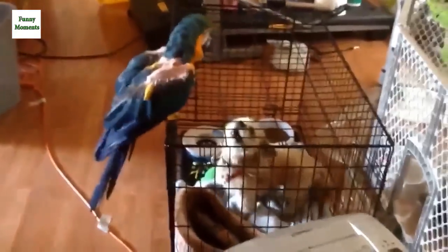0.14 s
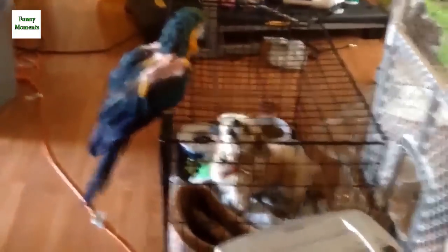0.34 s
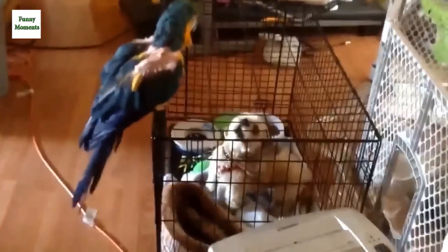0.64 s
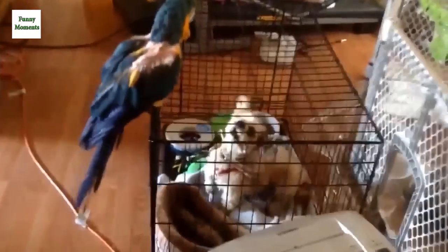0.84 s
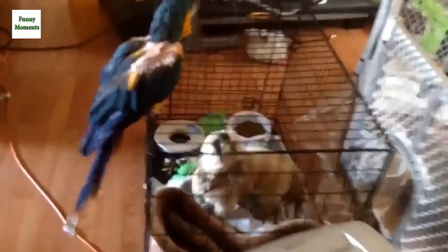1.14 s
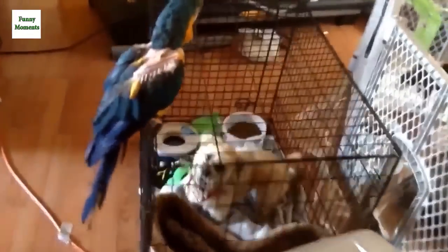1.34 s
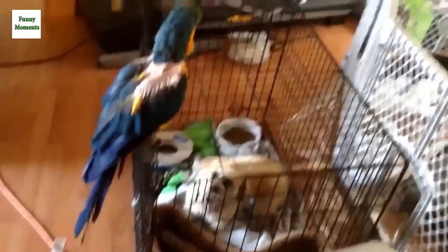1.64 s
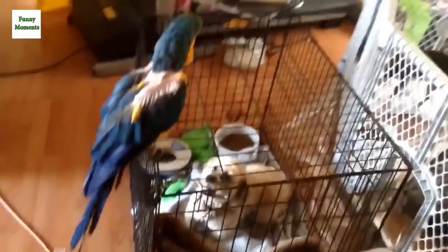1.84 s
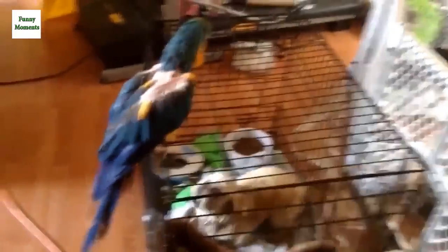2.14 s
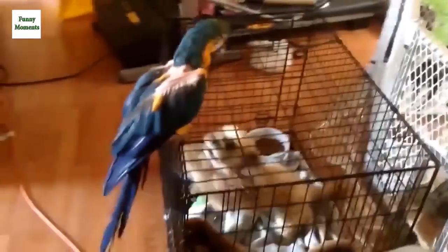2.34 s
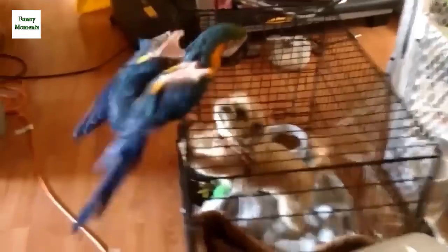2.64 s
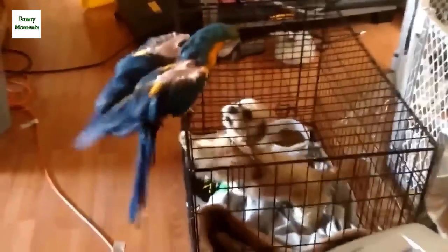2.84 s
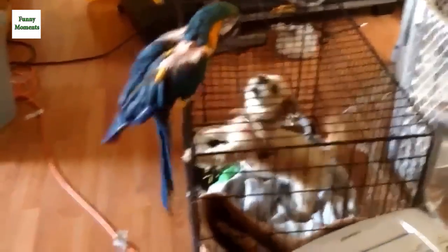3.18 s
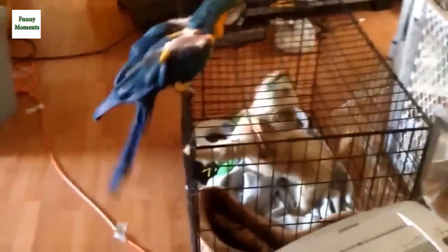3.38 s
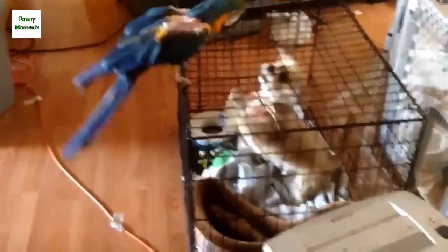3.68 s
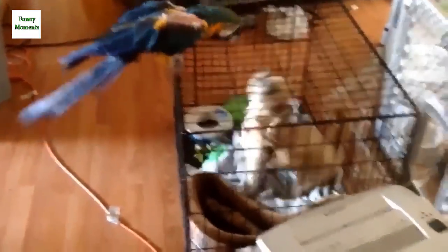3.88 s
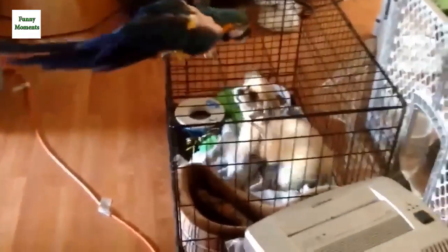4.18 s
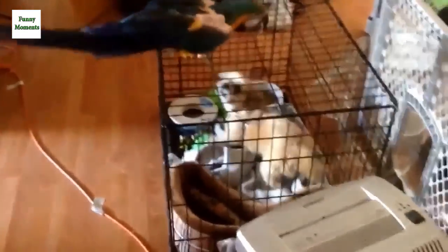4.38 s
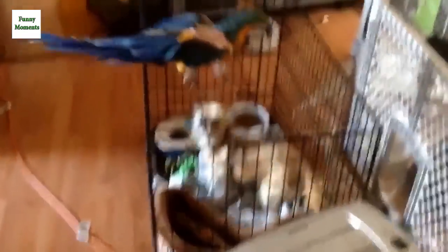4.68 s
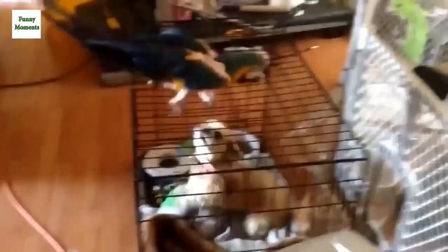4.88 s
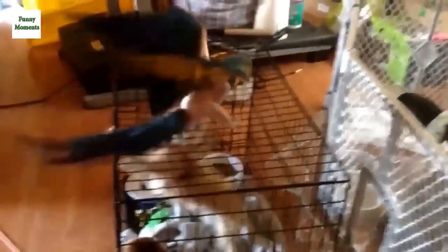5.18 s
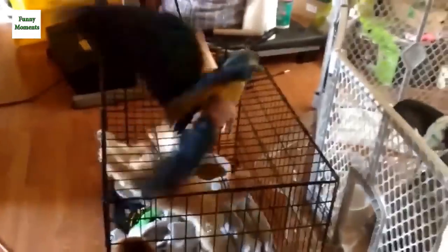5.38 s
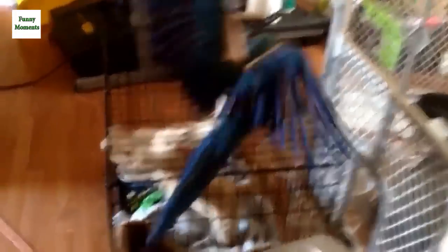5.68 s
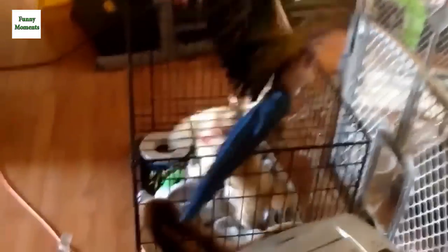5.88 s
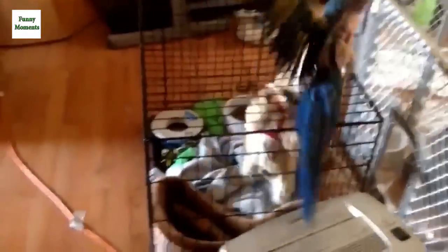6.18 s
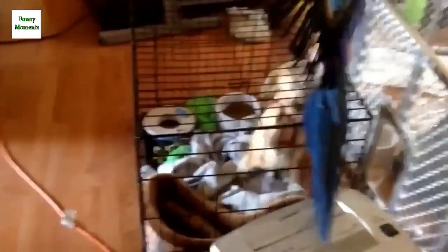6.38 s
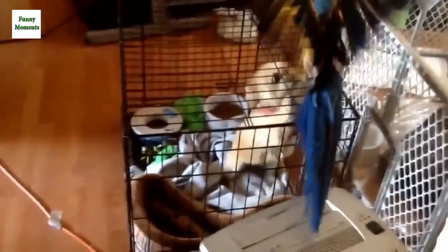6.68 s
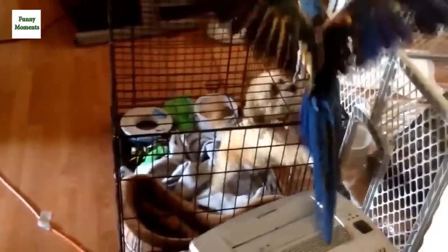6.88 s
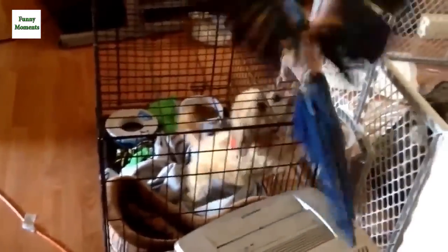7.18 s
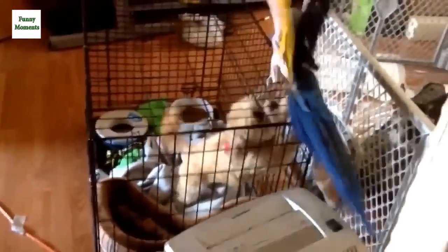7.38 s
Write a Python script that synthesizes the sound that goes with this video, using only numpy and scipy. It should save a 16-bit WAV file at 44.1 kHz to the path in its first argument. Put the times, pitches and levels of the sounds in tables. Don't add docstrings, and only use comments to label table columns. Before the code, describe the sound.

Breathy, pitch-breaking yaps from a small caged dog come first, irregularly spaced, with a soft whine after the third. The barking stops at about four seconds and gives way to scrambling paws, hard knocks, jingling wire and bursts of feathery flapping. A brief muffled growl sits under the late commotion. Indoors, lively hard-room reflections, quiet air, modest microphone with little bass.

```python
import sys
import numpy as np
from scipy import signal
from scipy.fft import rfft, irfft
from scipy.io import wavfile
from scipy.ndimage import uniform_filter1d, minimum_filter1d

SR = 44100
rng = np.random.default_rng(int(sys.argv[2]) if len(sys.argv) > 2 else 0)


def int16_out(signal):
    q = np.round(np.clip(np.atleast_2d(signal).T, -1, 1) * 32767)
    wavfile.write(sys.argv[1], SR, q.astype(np.int16))


def gain_from_db(level_db):
    decades = np.asarray(level_db, float) / 20
    return 10 ** decades


N = 332073

# (pitch [Hz], level [dB], time to die by 60 dB [s])
WIRES = [(5440, -12, .05), (7160, -16, .25), (8500, -8, .04), (9200, -4, .05), (9590, -5, .06),
         (10200, -8, .06), (11500, -4, .08), (11900, -4, .06), (12400, -2, .07), (12900, -1, .08),
         (13900, -8, .06)]


def rms_one(x):
    return x / np.sqrt(np.mean(x ** 2) + 1e-20)


def at_hz(points, hz):
    p = np.array(points)
    return np.interp(np.log(np.maximum(hz, 1)), np.log(p[:, 0]), p[:, 1])


def coloured(x, spectrum):
    hz = np.fft.rfftfreq(len(x), 1 / SR) + 1
    low_skirt = np.minimum(hz / spectrum[0][0], 1) ** 4
    high_skirt = np.minimum(spectrum[-1][0] / hz, 1) ** 4
    gain = gain_from_db(at_hz(spectrum, hz)) * low_skirt * high_skirt
    return rms_one(irfft(rfft(x) * gain, len(x)))


def band(x, low_hz, high_hz):
    edges = [low_hz, min(high_hz, .45 * SR)]
    return rms_one(signal.sosfilt(signal.butter(2, edges, "band", fs=SR, output="sos"), x))


def drift(rate_hz, size):
    r = np.exp(-2 * np.pi * rate_hz / SR)
    noise = rng.standard_normal(size + 4000)
    return rms_one(signal.lfilter([1], [1, -2 * r, r * r], noise)[4000:])


def patchy(x, low_hz, high_hz, patchy_db, rate_hz):
    edges = np.geomspace(low_hz, high_hz, 6)
    total = 0
    for lo, hi in zip(edges, edges[1:]):
        part = signal.sosfilt(signal.butter(1, [lo, hi], "band", fs=SR, output="sos"), x)
        total = total + part * gain_from_db(patchy_db * drift(rate_hz, len(x)))
    return rms_one(total)


def span(rows, rise_s, fall_s):
    s, *columns = np.transpose(rows)
    end_s = s[-1] + fall_s
    t = np.arange(round(s[0] * SR), min(round(end_s * SR), N)) / SR
    fade = np.clip((t - s[0]) / rise_s, 0, 1) * np.clip((end_s - t) / fall_s, 0, 1)
    return round(s[0] * SR), [np.interp(t, s, c) for c in columns], fade


def voice(calls, throat, jitter, shimmer_db, wobble_hz, half_db, split_hz, uneven_db, chest_db, low_air_db):
    # (frequency [Hz], level [dB])
    breath = [(1760, -29.5), (3000, -2.5), (3980, -8), (4760, -4.5), (5470, -9.5), (5820, -9.5),
              (10500, -4), (14300, -14.5), (15600, -9.5)]
    out = np.zeros(N)
    for rows in calls:
        start, (level_db, pitch, rough, open_db, hiss_db), fade = span(rows, rise_s=0.005, fall_s=0.0073)
        rough, size = np.clip(rough, 0, 1), len(fade)
        pitch = pitch * (1 + jitter * (rough + .04) * drift(wobble_hz, size))
        phase = 2 * np.pi * np.cumsum(pitch) / SR

        k = np.arange(1, 41)[:, None] / 2
        shifting_db = uneven_db * np.array([drift(16.0, size) for _ in k])
        gains = gain_from_db(at_hz(throat, k * pitch) + open_db * (k > 1) + shifting_db)
        gains *= k * pitch < throat[-1][0]
        gains[::2] *= rough * gain_from_db(half_db) * drift(26, size)
        tone = np.sum(gains * np.cos(k * phase + k ** 2), axis=0)
        tone /= np.sqrt(np.sum(gains ** 2, axis=0) / 2)
        tone *= gain_from_db(shimmer_db * rough * drift(wobble_hz, size))

        gate = (1 + np.cos(phase)) / 2
        air = coloured(rng.standard_normal(size) * gate, throat)
        upper = signal.sosfiltfilt(signal.butter(2, split_hz, "high", fs=SR, output="sos"), air)
        air = gain_from_db(low_air_db) * (air - upper) + gain_from_db(open_db) * upper
        hiss = coloured(rng.standard_normal(size) * gate, breath)
        hiss = patchy(hiss, 2436, 15700, patchy_db=2.56, rate_hz=22.7)
        hiss *= gain_from_db(1.3 * drift(40, size))
        push = band(rng.standard_normal(size), 200, 670) * gain_from_db(chest_db + hiss_db)

        sound = np.sqrt(1 - rough ** 2) * tone + rough * air + gain_from_db(hiss_db) * hiss + push
        out[start:start + size] += gain_from_db(level_db) * fade * sound
    return out


def yap(s, rise_s, db, hz, open_db):
    burst_pitch, burst_hiss_db, peak_hiss_db, rough = .92, -8.5, -13.5, 0.4974
    catch_s = s + 0.576 * rise_s
    catch_hz = hz * (1 + burst_pitch) / 2
    catch_hiss_db = (burst_hiss_db + peak_hiss_db) / 2
    return [(s, db - 23.5, hz * burst_pitch, rough, 0, burst_hiss_db),
            (catch_s, db - 11.5, catch_hz, rough, open_db, catch_hiss_db),
            (s + rise_s, db, hz, rough, open_db, peak_hiss_db),
            (s + rise_s + .05, db - 8.5, hz, rough, open_db - 7, -25.5)]


def slip(s, length_s, db, hz, open_db):
    rough, hiss_db = 0.35, -35
    return [(s, db, hz, rough, open_db, hiss_db),
            (s + 0.46 * length_s, db - 4.5, hz, rough, open_db, hiss_db),
            (s + length_s, db - 23, hz * 0.98, rough, open_db, hiss_db)]


def yaps():
    # (start [s], rise [s], peak [dB], pitch [Hz], mouth opening [dB])
    barks = [
        (0.06, 0.023, -11.5, 1042, -1.5),
        (0.519, 0.025, -9.5, 1089, -2),
        (1.177, .038, -11, 902, -27),
        (2.237, 0.04, -10, 1015, 7),
        (2.548, 0.0402, -15.5, 959, -2),
        (3.024, 0.0405, -9.5, 955.8, -5.5),
        (3.452, 0.036, -13.5, 922, -0.5),
        (3.872, 0.054, -14.5, 953.4, -7),
    ]
    # (start [s], length [s], level [dB], pitch [Hz], mouth opening [dB])
    jumps = [(0.109, 0.048, -10.5, 681, 1.5), (0.082, 0.029, -5.5, 1015, -13),
             (0.135, 0.052, -18, 1098, -14.5), (0.573, 0.1, -13.5, 1065, -23),
             (1.205, 0.093, -14.5, 740, -8), (1.25, 0.043, -13.5, 882, -35), (2.249, .04, -20.5, 587, -33),
             (2.298, 0.062, -13, 647.4, -7), (2.572, .055, -11, 993, -5), (2.622, 0.064, -14.5, 722, -1.5),
             (2.53, .04, -39, 422, -36), (3.088, .06, -14, 946, -2), (3.523, 0.099, -14.5, 964, -55),
             (3.944, 0.062, -9.5, 938, -17)]
    # (frequency [Hz], level [dB])
    throat = [(150, -65.5), (520, -27.5), (660, -8.5), (780, -4), (960, -3.5), (1200, -5), (1450, -7),
              (2000, -12.5), (2600, -15.5), (3300, -40.5), (4700, -33.5), (6000, -45)]
    calls = [yap(*row) for row in barks] + [slip(*row) for row in jumps]
    return voice(calls, throat, jitter=0.1093, shimmer_db=4.5, wobble_hz=53.9, half_db=2.5,
                 split_hz=2400, uneven_db=2.5, chest_db=-7.5, low_air_db=3.0)


def whine():
    # (time [s], level [dB], pitch [Hz])
    path = [
        (1.371, -32.5, 601),
        (1.413, -23.5, 648.6),
        (1.499, -21, 698.5),
        (1.599, -15.5, 721.8),
        (1.705, -15.5, 702.8),
        (1.735, -18, 670.2),
        (1.81, -18.5, 571.4),
        (1.871, -29, 349.4),
        (1.96, -44.5, 185.5),
    ]
    # (frequency [Hz], level [dB])
    throat = [(190, 4), (700, 0), (1000, -4.5), (1400, 1), (1900, -7), (2200, -11), (2500, -14.5),
              (2880, 0.5), (3800, -19), (5000, -18), (6400, -24), (9000, -28), (15500, -48)]
    s, db, hz = np.transpose(path)
    slack = (s > s[hz.argmax()]) & (hz < 690)
    rough = np.where(slack, .35, .015)
    hiss_db = np.where(slack, -21.5, -46)
    open_db = 12.5 + 0.86 * np.maximum(db - db.max(), -12)
    rows = np.transpose([s, db, hz, rough, open_db, hiss_db])
    return voice([rows], throat, jitter=0.0518, shimmer_db=1.0, wobble_hz=61.0, half_db=-42,
                 split_hz=3100, uneven_db=3.0, chest_db=-43, low_air_db=-40)


def grumble():
    # (time [s], level [dB], pitch [Hz])
    path = [
        (6.542, -25, 409),
        (6.553, -21.5, 394.3),
        (6.59, -28.5, 388),
        (6.647, -31, 276.7),
        (6.836, -30, 301.3),
        (6.88, -29.5, 349.8),
        (6.949, -26, 362.2),
        (7.03, -64, 285),
    ]
    # (frequency [Hz], level [dB])
    throat = [(150, -18), (350, 7), (650, 0.5), (900, -6), (1200, -7), (1600, -23), (3000, -28)]
    rough, open_db, hiss_db = 0.405, -2.5, -15
    rows = [(*row, rough, open_db, hiss_db) for row in path]
    return voice([rows], throat, jitter=0.1064, shimmer_db=5.5, wobble_hz=45, half_db=-7,
                 split_hz=360, uneven_db=-6.0, chest_db=-30, low_air_db=4)


def resonate(x, hz, width_hz):
    r = np.exp(-np.pi * width_hz / SR)
    ring = [1, -2 * r * np.cos(2 * np.pi * hz / SR), r * r]
    return signal.lfilter([(1 - r * r) / 2, 0, (r * r - 1) / 2], ring, x)


def dying(x, t60):
    return signal.lfilter([1], [1, -gain_from_db(-60 / (t60 * SR))], x)


def grains(per_s, spread_db):
    sizes = gain_from_db(spread_db * np.minimum(rng.exponential(1, N), 5)) * rng.choice([-1, 1], N)
    return sizes * (rng.random(N) < per_s / SR)


def knocks():
    # (time [s], peak [dB], tray thud over it [dB], wire ring over it [dB])
    hits = [(4.404, -27, -7.5, -25), (4.43, -24, -11, -20), (4.479, -26, -22, -7),
            (4.7098, -30.5, -8.5, -34), (4.826, -30, -8.5, -26), (4.862, -37, 0, -19),
            (5.002, -19.5, -23, -32), (5.139, -43, 0, -28), (5.267, -19, -25.5, -10),
            (5.3117, -9, -12.5, -40), (5.5379, -6.5, -30, -52), (5.6286, -17, -27, -6),
            (5.7057, -11.5, -30, -32), (5.802, -18, -28, -12), (5.838, -23, -39, 3), (6.018, -44, 0, -20),
            (6.0594, -23, -32, -4), (6.1785, -25, -18, -4), (6.3053, -35, -37, 15.5),
            (6.4837, -12.5, -44, -32), (6.8587, -26, -15, 3), (6.976, -10.5, -31, -4),
            (7.252, -35, -27, 4.5), (7.2942, -19.5, -34, -31), (7.394, -22, -22.5, -19),
            (7.418, -32, -13, -22), (7.5203, -25.5, -24, 6), (0.001, -52.5, -32, 14.5),
            (2.473, -39, -30, 0), (2.745, -40, -30, 7)]
    # (pitch [Hz], width [Hz], level [dB])
    tray = [(252, 45, -5), (540, 77, -2.5), (740, 390, 3)]
    s, peak_db, thud_db, ring_db = np.transpose(hits)
    at = np.round(s * SR).astype(int)
    crack, thump = np.full((2, N), 1e-18)
    crack[at] = gain_from_db(peak_db - 19.5)
    thump[at] = gain_from_db(peak_db + thud_db + 1.5)
    out = dying(crack, .035) * band(rng.standard_normal(N), 900, 7000)
    thump = dying(thump, .08) * rng.standard_normal(N)
    for hz, width_hz, db in tray:
        out += gain_from_db(db + 10.0) * resonate(thump, hz, width_hz)

    uneven_db = rng.normal(0, 4.5, (len(at), len(WIRES)))
    chatter = grains(per_s=300, spread_db=4.0)
    for k, (hz, db, t60) in enumerate(WIRES):
        clicks = np.full(N, 1e-18)
        clicks[at] = gain_from_db(peak_db + ring_db + db - 27.0 + uneven_db[:, k])
        clicks += dying(clicks, 0.19) * np.roll(chatter, 5000 * k)
        r, w = gain_from_db(-60 / (t60 * SR)), 2 * np.pi * hz / SR
        out += signal.lfilter([0, np.sin(w)], [1, -2 * r * np.cos(w), r * r], clicks)
    return out


def swell(s, db, rise_s, t60):
    since = np.maximum(np.arange(N) / SR - s, 0)
    return np.minimum(since / rise_s, 1) * gain_from_db(db - np.minimum(60 * since / t60, 200))


def rustle():
    # (time [s], swish [dB])
    flapping = [(2.4, -95), (2.5, -52.5), (2.75, -43), (3.1, -57), (3.86, -67), (4.2, -58), (4.66, -65),
                (5.28, -54), (5.58, -46), (6.28, -63), (6.7, -64), (7.0, -42.5), (7.25, -53.5)]
    # (time [s], swish peak [dB], time to die by 60 dB [s])
    beats = [(0.47, -65, 0.16), (2.72, -60, 0.35), (2.87, -53.5, .6), (3.33, -61, 0.4), (3.7, -52, 0.15),
             (4.18, -67, 0.46), (4.28, -50, 0.55), (4.47, -51, 0.45), (4.72, -45.5, 0.63),
             (4.94, -50.5, .5), (5.07, -54, 0.21), (5.18, -45.5, 0.83), (5.4, -41.5, 1),
             (5.62, -40.5, 0.56), (5.81, -43, 1), (6.04, -42.5, 0.92), (6.17, -58, 0.36), (6.3, -52, 1),
             (6.42, -44.5, 0.99), (6.58, -41, .7), (6.84, -40.5, 0.76), (6.948, -37.5, 0.67),
             (7.24, -55, 0.61), (7.37, -64, 0.46), (7.5, -46, .4)]
    # (time [s], peak [dB], thud over it [dB], time to die by 60 dB [s])
    scrambles = [(0.974, -49.5, -13.5, 0.16), (1.09, -66, 3.5, 0.33), (2.05, -60, -8, .3),
                 (2.72, -60, 2, 0.77), (2.8, -43.5, -15, 0.86), (2.859, -47, -15, 0.31),
                 (2.92, -69, -1, .6), (3.3, -48.5, -5, 0.38), (3.4, -51, -10, 0.36),
                 (3.74, -49.5, -18, 0.14), (4.098, -45, -5.5, 0.71), (4.4, -32.5, -0.5, 0.29),
                 (4.424, -35, -3.5, 0.27), (4.673, -46.5, 0, 0.45), (4.848, -48.5, 7, 0.18),
                 (4.996, -41, -11, 0.34), (5.154, -40, 8.5, 0.19), (5.298, -20, -11.5, 0.31),
                 (5.54, -31, -16, 0.23), (6.013, -51, 18.5, 0.26), (6.4, -48, -5, 0.71),
                 (6.66, -45.5, 12, 0.2), (6.82, -47.5, -19, 0.75), (6.99, -41.5, -2.5, 0.5),
                 (7.39, -51, 2.5, 0.29), (7.51, -53, -12, 0.31)]
    thud = band(grains(per_s=900, spread_db=4.0), 219, 920) * gain_from_db(1.6 * drift(25, N))
    scuffle = band(grains(per_s=3300, spread_db=3.5), 1200, 4340) * gain_from_db(0.97 * drift(57, N))
    swish = patchy(grains(per_s=4000, spread_db=-0.5), 4100, 14500, patchy_db=2.6, rate_hz=11)
    swish *= gain_from_db(1.0 * drift(25, N))
    tinkle = np.zeros(N)
    for hz, db, t60 in WIRES:
        touches = grains(per_s=9, spread_db=-5) + 1e-18
        tinkle += gain_from_db(db) * resonate(touches, hz, 2.0 / t60)
    swish += gain_from_db(-9) * rms_one(tinkle)

    effort = gain_from_db(np.interp(np.arange(N) / SR, *np.transpose(flapping)))
    for s, db, t60 in beats:
        effort += swell(s, db, 0.029, t60)
    out = effort * (swish + gain_from_db(-4.5) * scuffle + gain_from_db(-4.5) * thud)
    for s, db, thud_db, t60 in scrambles:
        out += swell(s, db, 0.0081, t60) * (scuffle + gain_from_db(thud_db) * thud + gain_from_db(-24) * swish)
    return gain_from_db(-4.0) * out


def room(x, wet_db, gap_s):
    # (frequency [Hz], time to die by 60 dB [s])
    echo_t60 = [(200, 0.22), (600, 0.36), (1400, 0.37), (3500, 0.37), (8000, 0.31), (14000, 0.19)]
    t = np.arange(SR) / SR
    edges = 100 * 2 ** np.arange(0, 7.6, .5)
    tail = np.zeros(SR)
    for lo, hi in zip(edges, edges[1:]):
        fading = gain_from_db(-60 * t / at_hz(echo_t60, np.sqrt(lo * hi)))
        tail += band(rng.standard_normal(SR), lo, hi) * np.sqrt(hi - lo) * fading
    tail *= np.clip(t / gap_s - 1, 0, 1)
    tail /= np.sqrt(np.sum(tail[:4000] ** 2))
    return x + gain_from_db(wet_db) * signal.fftconvolve(x, tail)[:N]


def background():
    # (frequency [Hz], level [dB])
    air_colour = [(59, -41), (100, -21.5), (204, -2), (416, -26), (620, -1), (1920, 2.5), (2370, -2),
                  (9660, -22.5), (15000, -42.5)]
    # (time [s], pitch [Hz], level [dB])
    hums = [
        [(1.95, 239, -74.5), (2.24, 242, -73)],
    ]
    out = gain_from_db(-60.5 + 2.6 * drift(17, N)) * coloured(rng.standard_normal(N), air_colour)
    for rows in hums:
        start, (hz, level_db), fade = span(rows, rise_s=0.021, fall_s=0.03)
        loudness = gain_from_db(level_db + 3.0 + 3.8 * drift(7.8, len(fade))) * fade
        out[start:start + len(fade)] += loudness * np.sin(2 * np.pi * np.cumsum(hz) / SR)
    return out


def scene():
    dog = gain_from_db(-0.5) * yaps() + gain_from_db(-6.0) * whine() + gain_from_db(-7.5) * grumble()
    in_room = room(dog + knocks() + rustle(), wet_db=-4.0, gap_s=0.0022)
    return (in_room + background())[None]


def band_limit(x):
    return signal.sosfilt(signal.butter(12, 15760, fs=SR, output="sos"), x)


def record(dry):
    limit_db, recovery_db_per_s = -4, 150
    x = signal.sosfilt(signal.butter(4, 135, "high", fs=SR, output="sos"), dry)
    over_db = np.maximum(20 * np.log10(np.abs(x) + 1e-9) - limit_db, 0)
    ramp = recovery_db_per_s * np.arange(N) / SR
    held_db = np.maximum.accumulate(over_db + ramp, axis=1) - ramp
    ahead_db = -minimum_filter1d(-held_db, size=89)
    x = x * gain_from_db(-uniform_filter1d(ahead_db, size=89))
    x = signal.sosfilt(signal.cheby2(12, 60, 15800, fs=SR, output="sos"), x)
    return band_limit(x)


dry = scene()
out = record(dry)
int16_out(out)
```